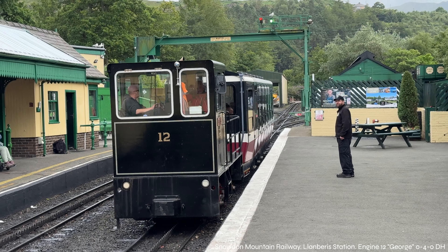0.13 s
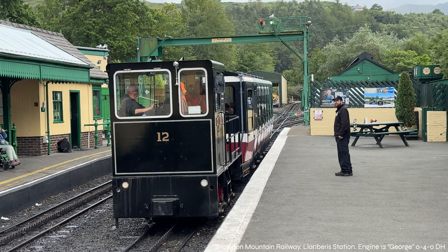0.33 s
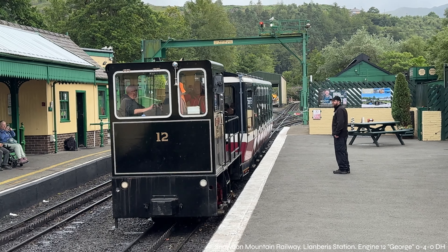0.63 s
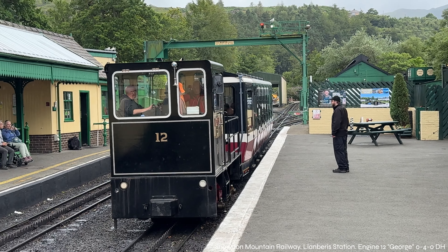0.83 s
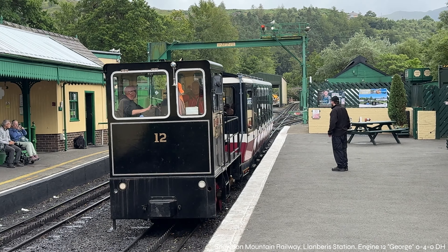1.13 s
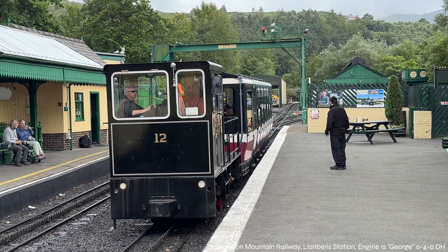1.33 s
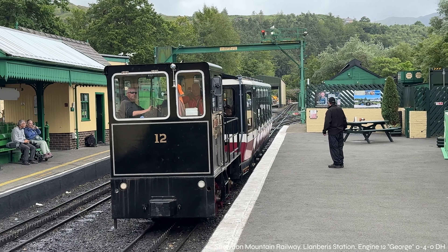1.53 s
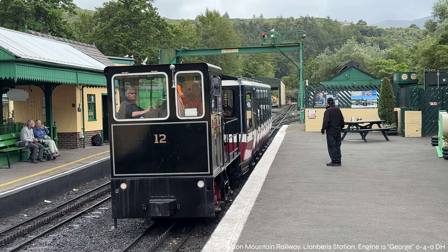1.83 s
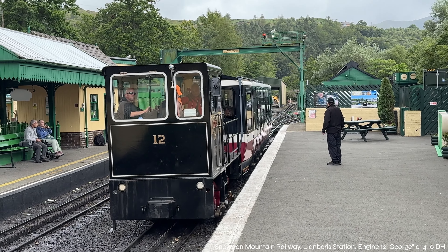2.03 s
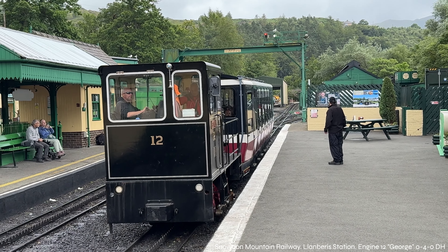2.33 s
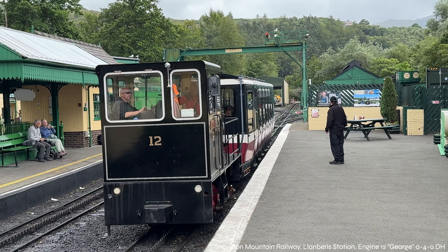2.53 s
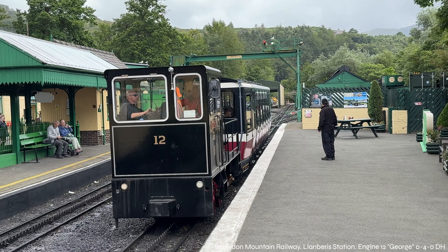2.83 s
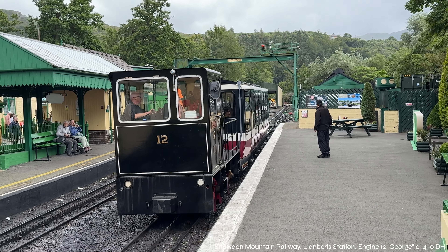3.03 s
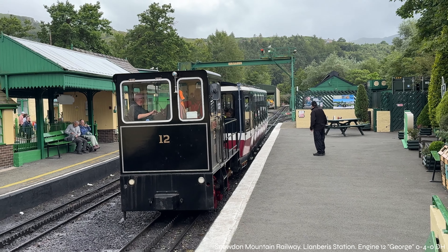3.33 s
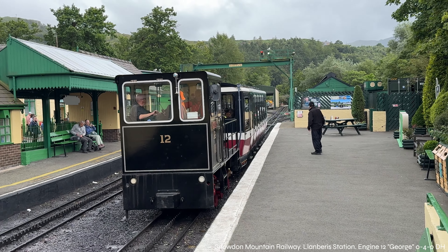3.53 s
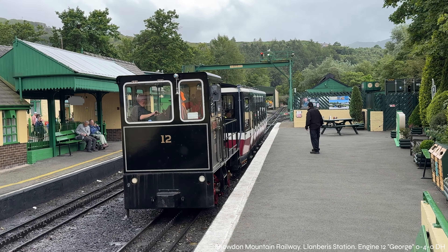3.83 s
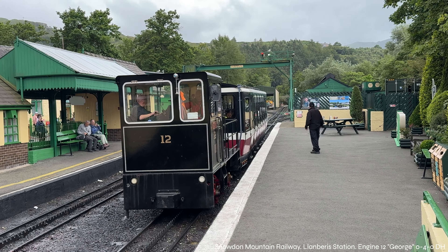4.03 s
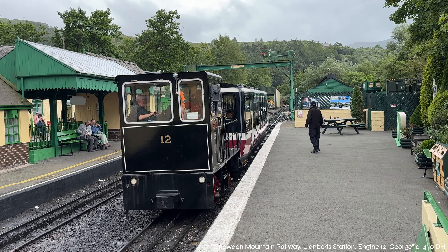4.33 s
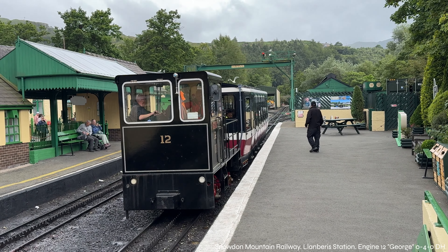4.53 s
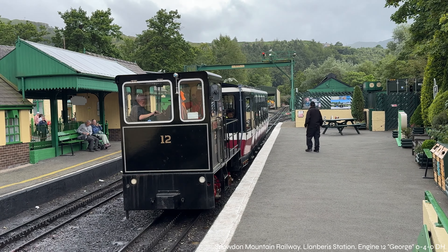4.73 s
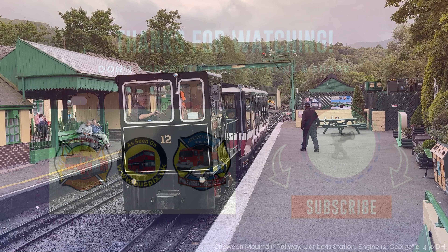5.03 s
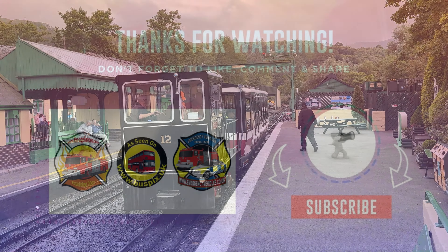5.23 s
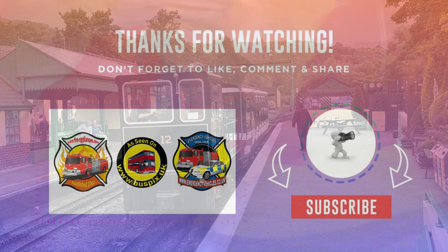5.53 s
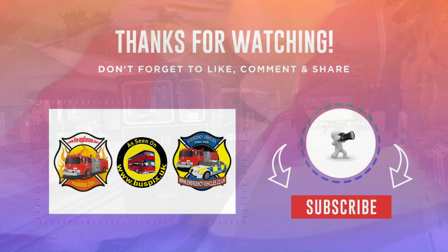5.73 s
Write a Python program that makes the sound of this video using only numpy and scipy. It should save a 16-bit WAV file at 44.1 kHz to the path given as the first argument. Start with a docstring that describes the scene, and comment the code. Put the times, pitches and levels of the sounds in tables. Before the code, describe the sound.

A diesel rack locomotive rolls slowly into an open-air station, close and slightly left in a stereo pickup, with short scattered reflections. From 0 s there is deep rumble, gritty mid-range roar, fine grinding, an engine hum and clatter underneath, and soft low booms as the frame sways. Metal teeth knock about every 0.1 s until 1.1 s, strongest around 0.5-0.9 s, then more irregularly to 2.8 s, each a thud, clank, short ping and scrape. At 1.8-2.6 s a rough, trembling brake groan sinks from a middling-low pitch. From 2.8 s the knocks are gone and the rumble dwindles; the rest of the running noise eases after 3.7 s. The multi-toned hum stands out, sinking slightly to idle. Faint high air whistles step up then down at 2.95-3.5 s and again at 3.95-5.0 s, ending lower. Thin hiss remains; everything fades from 5.1 to 5.8 s.

```python
"""A diesel rack locomotive creeps into a mountain station and slows to a halt.
From the start its running gear rumbles, its frame booms and the engine hums and clatters; the pinion knocks
over the rack teeth. Then a brake groans briefly, sinking in pitch. As the wheels fall quiet the hum stands out
and settles to idle, while an air valve whistles twice in stepping notes. At the end the sound fades out.
Rough sounds are filtered noise and small impacts; the hum, groan, whistles and clean rings are sine waves."""
import sys
import numpy as np
from scipy import signal
from scipy.fft import rfft, irfft
from scipy.io import wavfile
from scipy.ndimage import uniform_filter1d

SR = 44100
rng = np.random.default_rng(int(sys.argv[2]) if len(sys.argv) > 2 else 0)


def wav_record(signal):
    """Record a signal, one row per channel, as 16-bit PCM in the file named by sys.argv[1]."""
    frames = np.transpose(np.atleast_2d(signal))
    bounded = np.clip(frames, -1, 1)
    # unit amplitude maps onto the largest positive 16-bit level
    quanta = np.round(bounded * 32767).astype(np.int16)
    wavfile.write(sys.argv[1], SR, quanta)


N = 260184
TIME, FREQ = np.arange(N) / SR, np.fft.rfftfreq(N, 1 / SR)   # seconds, Hz


def from_db(db):
    """Turn decibels into a gain."""
    return 10 ** (np.asarray(db) / 20)


def rms_one(x):
    """Scale a signal to an rms of one."""
    return x / np.sqrt(np.mean(x ** 2) + 1e-20)


def in_time(rows):
    """Read each column of a curve table at every sample."""
    s, *columns = np.transpose(rows)
    return [np.interp(TIME, s, c) for c in columns]


def response(points):
    """Gain at every frequency from (Hz, dB) points; it falls away below the first."""
    hz, db = np.transpose(points)
    gain = from_db(np.interp(np.log(FREQ + 1), np.log(hz), db))
    return gain * np.minimum(FREQ / hz[0], 1) ** 2


def colour(x, points):
    """Shape a white signal with a spectrum, keeping its power."""
    return irfft(rfft(x) * rms_one(response(points)), N)


def resonate(x, modes):
    """Resonances side by side with alternating signs; a white signal keeps its power."""
    out, power = 0, 0
    for k, (hz, width, db) in enumerate(modes):
        r = np.exp(-np.pi * width / SR)
        peak = (1 - r * r) / 2
        feedback = [1, -2 * r * np.cos(2 * np.pi * hz / SR), r * r]
        mode = signal.lfilter([peak, 0, -peak], feedback, x + 1e-18)
        out = out + (-1) ** k * from_db(db) * mode
        power += peak * from_db(db) ** 2
    return out / np.sqrt(power)


def drift(rate):
    """Slow random motion of spread 1; a higher rate in Hz moves faster."""
    return rms_one(irfft(rfft(rng.standard_normal(N)) / (1 + (FREQ / rate) ** 2), N))


def contacts(per_s, spread_db, share):
    """Random small impacts of uneven size over smooth friction noise; share is the impacts' part of the power."""
    sizes = from_db(spread_db * np.minimum(rng.exponential(1, N), 3))
    clicks = (rng.random(N) < per_s / SR) * sizes * rng.choice([-1, 1], N)
    share = np.clip(share, 0, 1)
    return np.sqrt(share) * rms_one(clicks) + np.sqrt(1 - share) * rng.standard_normal(N)


def blows(times, levels_db, attack_s, decay_s):
    """Envelope of blows that rise quickly and die away; overlapping blows add in power."""
    power = np.zeros(N)
    for s, db in zip(times, levels_db):
        age = TIME[TIME >= s] - s
        shape = (1 - np.exp(-age / attack_s)) * np.exp(-age / decay_s)
        power[N - len(age):] += (from_db(db) * shape) ** 2
    return np.sqrt(power)


def tones(times, pitches, levels_db, attack_s, decay_s):
    """Clean sine rings, one for each blow."""
    return sum(blows([s], [db], attack_s, decay_s) * np.sin(2 * np.pi * hz * (TIME - s))
               for s, hz, db in zip(times, pitches, levels_db))


# Colours of rumble, roar and grinding. Each row: frequency in Hz, relative level in dB per Hz.
RUMBLE_COLOUR = [(25, -20), (36, -12.5), (45, -3), (60, 4), (80, 5.5), (115, -1.5), (170, -6), (300, -59)]
ROAR_COLOUR = [(70, -18), (135, -0.5), (220, 0.5), (350, 0.5), (450, -4), (720, -8.5), (960, -8.5),
               (1050, -6.5), (1220, -18), (1700, -49)]
GRIND_COLOUR = [(1000, -13.5), (1900, 1), (2450, 2), (2800, -0.5), (3300, -2.5), (3900, -4.5), (5200, -10),
                (6600, -9.5), (8000, -16.5), (10000, -16), (12500, -26), (16000, -41)]
# How the rack with its bed, and the pinion with its gears, ring; the knocks use both again.
# Each row: frequency in Hz, width in Hz, relative level in dB.
RACK_MODES = [(490.4, 45, 4), (692, 74, 6.5), (868, 133, 2.5), (1309, 70, -1)]
PINION_MODES = [(1425, 108, -5.5), (1713, 133, -3), (1982, 107, -7), (2232, 67, -9), (2550, 340, -18),
                (3300, 1000, -24.5)]
# Force on the pinion. Each row: time in seconds, relative force in dB.
PINION_LOAD = [(0.06, -11.5), (0.21, -5), (0.5, 8), (0.85, 2.5), (0.98, -18.5), (1.6, -13.5), (2.2, -2.5),
               (2.5, -5), (2.75, -4.5), (2.81, -23), (2.88, -6), (3.3, 0)]
LOAD_SHARE = 0.18   # part of the load's swing in dB that mesh and grinding follow
RUMBLE_DB, ROAR_DB, MESH_DB, GRIND_DB = -29, -25.5, -31, -40   # levels before halting and wander
RUMBLE_HALTING_S, RUMBLE_HALT_DB_PER_S = 2.63, 4   # the rumble begins to fall quiet earlier and faster
HALTING_S, HALT_DB_PER_S = 3.73, 2.5   # roar, mesh and grinding


def running_gear():
    """Wheels and rods shake the frames; a random wander moves roar, gear mesh and grinding together."""
    load_db, = in_time(PINION_LOAD)
    pressed_db = LOAD_SHARE * (load_db - load_db.mean())
    wander = drift(rate=21)
    halt_db = HALT_DB_PER_S * np.maximum(TIME - HALTING_S, 0)
    rumble_halt_db = RUMBLE_HALT_DB_PER_S * np.maximum(TIME - RUMBLE_HALTING_S, 0)

    rumble = colour(contacts(per_s=160, spread_db=1.5, share=0.17), RUMBLE_COLOUR)
    rumble = from_db(RUMBLE_DB - rumble_halt_db) * rumble
    roar = colour(contacts(per_s=250, spread_db=2.0, share=0.27), ROAR_COLOUR)
    roar = from_db(ROAR_DB - halt_db + 1.0 * wander) * roar
    mesh_gain = from_db(MESH_DB + pressed_db - halt_db + 1.27 * wander)
    mesh_contacts = contacts(per_s=360, spread_db=1.0, share=0.41)
    mesh = resonate(mesh_gain * mesh_contacts, RACK_MODES + PINION_MODES)
    grind = colour(contacts(per_s=640, spread_db=3.5, share=0.08), GRIND_COLOUR)
    grind = from_db(GRIND_DB + pressed_db - halt_db + 0.76 * wander) * grind
    return rumble + roar + mesh + grind


# Heavy sways of the frame. Each row: start in seconds, pitch in Hz, relative level in dB.
BOOMS = [(0.0, 58, -19.5), (0.205, 54.5, -20.5), (0.5, 60, -30), (0.82, 56, -29), (0.98, 63.7, -25),
         (1.135, 55.2, -25.5), (1.755, 79.7, -25), (2.04, 90.7, -28.5), (2.146, 88.5, -23), (2.38, 76, -27),
         (2.495, 72, -28), (2.61, 58.7, -22.5), (2.81, 80.3, -28)]


def frame_booms():
    """The sprung frame swings for a few cycles after each lurch."""
    s, hz, db = np.transpose(BOOMS)
    return tones(s, hz, db + 11, attack_s=0.058, decay_s=0.047)


# Exhaust resonances. Each row: frequency in Hz, width in Hz, relative level in dB.
EXHAUST_MODES = [(107.25, 0.8, 3.5), (109.3, 1.3, 0), (129.4, 7, -0.5), (136.0, 3.2, 4.5),
                 (206.2, 1.1, 1.5), (234.9, .8, 6), (383.4, 1.0, 2), (388.3, 2.2, 2)]


def exhaust_db(hz):
    """Gain of the exhaust, in dB, for an order at this pitch."""
    power = sum(from_db(db) ** 2 / (1 + (2 * (hz - centre) / width) ** 2)
                for centre, width, db in EXHAUST_MODES)
    return 10 * np.log10(power)


# Engine speed. Each row: time in seconds, the hum's fundamental in Hz (half the firing rate).
ENGINE_SPEED = [(2.7, 23.4), (3.1, 23.1), (3.7, 22.42), (4.1, 21.87), (4.5, 21.48), (4.68, 21.37),
                (4.8, 21.35)]
# Engine effort. Each row: time in seconds, relative level in dB shared by hum and clatter.
EFFORT = [(2.9, -30.5), (3.35, -29.5), (4.1, -28), (4.5, -31.5), (4.75, -29.5), (5.0, -34.5)]
# Orders (multiples of the fundamental) that boom as the sinking speed carries them through an exhaust
# resonance. A plain list of multiples.
BOOMING_ORDERS = (5, 6, 9, 11, 17, 18)
# Weaker, steadier orders. Each row: multiple of the fundamental, relative level in dB.
STEADY_ORDERS = [(2, -10), (3, -13), (7, -10.5), (14, -8), (27, -10)]
# Engine block and covers. Each row: frequency in Hz, width in Hz, relative level in dB.
BLOCK_MODES = [(208, 17, -9), (386.4, 29, 3.5), (568.3, 29.6, 4.5), (718, 61, -2), (933.6, 50, -1),
               (1114, 90, -8), (1428, 144, -4.5), (1790, 95, -12), (3310, 90, -17)]
HUM_WAVER_DB = 0.8   # spread of each order's own slow waver


def engine():
    """The exhaust hums on multiples of the engine speed; every firing sets the block clattering."""
    hz = in_time(ENGINE_SPEED)[0] * (1 + .0008 * drift(rate=4))
    turns = np.cumsum(hz) / SR   # cycles of the fundamental so far
    effort_db, = in_time(EFFORT)

    orders = [(k, exhaust_db(k * hz)) for k in BOOMING_ORDERS]
    orders += [(round(k), db) for k, db in STEADY_ORDERS]
    hum = 0
    for k, db in orders:
        gain = from_db(effort_db + db + 0.5 + HUM_WAVER_DB * drift(rate=6.9))
        hum = hum + gain * np.sin(2 * np.pi * (k * turns + rng.random()))

    # valve gear and injectors repeat their pattern every six firings
    place = ((turns % 3) * SR / hz[-1]).astype(int)
    repeating = rng.standard_normal(SR)[place]
    firing = rms_one(np.exp(-(2 * turns % 1) / 0.39) + 1.8)   # two firings a cycle
    clatter = resonate(firing * (0.92 * repeating + 0.73 * rng.standard_normal(N)), BLOCK_MODES)
    return hum + from_db(effort_db - 1.5) * clatter


# Knocks of the pinion over the rack teeth, unevenly spaced. Each row: touch in seconds, then relative levels
# in dB of the frame thud, rack clank, pinion ring and flank scrape.
KNOCKS = [(0.112, -36, -28, -39, -34.5), (0.209, -18, -18.5, -31.5, -37.5),
          (0.299, -15.5, -21.5, -32.5, -34), (0.396, -23, -21.5, -40, -28), (0.498, -21, -18.5, -25.5, -29),
          (0.594, -21.5, -19, -23.5, -32), (0.694, -25.5, -15.5, -23.5, -32.5),
          (0.790, -16.5, -15, -21.5, -42), (0.88, -19, -18, -35, -51), (0.993, -25, -23.5, -44, -37),
          (1.07, -17, -23.5, -40, -44), (1.135, -22, -27, -38.5, -37.5), (1.32, -22, -23, -38, -46),
          (1.495, -20.5, -22, -34.5, -45), (1.735, -22, -21.5, -36, -36), (1.865, -17.5, -25.5, -33.5, -35),
          (1.963, -15.5, -22.5, -40, -34.5), (2.083, -34, -22.5, -37.5, -34), (2.205, -19, -20, -35, -32),
          (2.267, -21.5, -20, -35.5, -36), (2.437, -36.5, -22, -38, -35), (2.551, -29, -25, -32, -38),
          (2.68, -18.5, -20, -32.5, -36.5), (2.742, -18, -26.5, -36.5, -36), (2.81, -17.5, -33, -46, -50)]
# Colours of thud and scrape. Each row: frequency in Hz, relative level in dB per Hz.
THUD_COLOUR = [(45, -2.5), (100, 16.5), (220, 15.5), (340, 15.5), (500, 4), (900, -41)]
SCRAPE_COLOUR = [(1500, 5.5), (3200, 8.5), (5200, -2), (6800, 0.5), (10000, -20.5), (16000, -9)]
THUD_LAG_S, CLANK_LAG_S, PING_LAG_S = .016, 0.00405, 0.00079   # after the tooth touches
REBOUND_S, REBOUND_LOSS_DB = 0.017, 2.5   # a tooth rebounds once in its backlash
PING_HZ, PING_DB = 1957, 8.0   # clean first strike; level against the table's ring
RACK_RING_HZ, RACK_RING_DB, RACK_RING_S = 815, -6, .045   # level against the table's clank; time to fall by 1/e
PITCH_SPREAD = .025   # share by which both pitches differ from tooth to tooth


def rack():
    """Each tooth pings and rings the pinion, scrapes, rebounds, clanks the rack, which sings on, and thuds."""
    s, thud_db, clank_db, ring_db, scrape_db = np.transpose(KNOCKS)
    touches = np.r_[s, s + REBOUND_S]
    rings_db = np.r_[ring_db, ring_db - REBOUND_LOSS_DB]
    scrapes_db = np.r_[scrape_db, scrape_db - REBOUND_LOSS_DB]
    detune = 1 + PITCH_SPREAD * rng.standard_normal((len(s), 2))

    ping = tones(s + PING_LAG_S, PING_HZ * detune[:, 0], ring_db + PING_DB, attack_s=0.003, decay_s=0.007)
    sing = tones(s + CLANK_LAG_S, RACK_RING_HZ * detune[:, 1], clank_db + RACK_RING_DB,
                 attack_s=0.004, decay_s=RACK_RING_S)
    ring = blows(touches, rings_db, attack_s=0.0011, decay_s=0.035)
    ring = resonate(ring * contacts(per_s=500, spread_db=4.0, share=0.8), PINION_MODES)
    clank = blows(s + CLANK_LAG_S, clank_db, attack_s=0.0046, decay_s=0.03)
    clank = resonate(clank * contacts(per_s=500, spread_db=0.0, share=0.53), RACK_MODES)
    thud = blows(s + THUD_LAG_S, thud_db, attack_s=0.0056, decay_s=0.03)
    thud = colour(thud * contacts(per_s=320, spread_db=-0.5, share=0.33), THUD_COLOUR)
    scrape = blows(touches, scrapes_db, attack_s=0.0015, decay_s=0.017)
    scrape = colour(scrape * contacts(per_s=4100, spread_db=0.0, share=0.16), SCRAPE_COLOUR)
    return ping + sing + ring + clank + thud + scrape


GROAN_START_S, GROAN_ATTACK_S, GROAN_END_S, GROAN_RELEASE_S = 1.8, 0.058, 2.57, 0.23
GROAN_HZ, GROAN_SAG_HZ_PER_S, GROAN_DB = 348.5, 67.3, -27   # starting pitch, its fall, middle level


def brake():
    """A brake block bites, holds and lets go: a rough stick-slip tone that sinks as the wheel slows."""
    age = TIME - GROAN_START_S
    release = (GROAN_END_S - TIME) / GROAN_RELEASE_S
    grip = np.clip(np.minimum(age / GROAN_ATTACK_S, release), 0, 1)
    hz = (GROAN_HZ - GROAN_SAG_HZ_PER_S * age) * (1 + 0.0523 * drift(rate=43))
    phase = 2 * np.pi * np.cumsum(hz) / SR
    return grip * from_db(GROAN_DB + 2.6 * drift(rate=28)) * np.sin(phase)


# Notes of the air valve, rising and then sinking in steps, twice.
# Each row: start in seconds, length in seconds, starting pitch in Hz, glide in Hz per second,
# starting level in dB before the flutter.
WHISTLES = [(2.95, .075, 4660, 300, -47.5), (3.01, 0.045, 5270, 4500, -44.5),
            (3.05, 0.1, 5880, 1500, -48.5), (3.2, 0.14, 6000, -3600, -47.5),
            (3.367, 0.12, 5010, -1300, -45), (3.96, 0.11, 4370, -200, -49),
            (4.06, 0.045, 5050, 24000, -49.5), (4.10, 0.05, 6230, 1200, -45),
            (4.15, 0.16, 6230, -4900, -46), (4.32, 0.125, 5060, -1100, -46.5),
            (4.45, .035, 4680, 6000, -44.5), (4.49, 0.15, 4170, -1050, -49), (4.67, .065, 3970, -500, -48),
            (4.805, .22, 3000, -900, -45.5)]
NOTE_FADE_DB_PER_S, NOTE_WAVER = 12, .011   # fade within a note; share by which its pitch wavers


def air_valve():
    """Escaping air makes an unsteady edge tone that jumps from note to note."""
    out, waver, flutter_db = 0, drift(rate=200), 3.6 * drift(rate=45)
    for s, length, start_hz, glide, db in WHISTLES:
        age = np.clip(TIME - s, 0, length)
        blowing = uniform_filter1d(1. * ((age > 0) & (age < length)), size=800)   # softened edges
        hz = (start_hz + glide * age) * (1 + NOTE_WAVER * waver)
        gain = blowing * from_db(db + flutter_db - NOTE_FADE_DB_PER_S * age)
        out = out + gain * np.sin(2 * np.pi * np.cumsum(hz) / SR)
    return out


# Reflections off platform and buildings. Each row: frequency in Hz, level in dB against the direct sound.
REFLECTED = [(60, -29), (300, -15), (600, -9), (1000, -4), (1400, -6.5), (2100, -22.5), (3500, -11.5),
             (6000, -21), (8600, -81.5), (10000, -11), (14000, -18.5)]


def station(x):
    """Scattered reflections follow the direct sound, with opposite signs on the two sides."""
    scatter = rfft(rng.standard_normal(N) * (TIME > .02) * np.exp(-TIME / .08))
    scatter = scatter / np.sqrt(np.mean(abs(scatter) ** 2))
    side = irfft(rfft(x) * scatter * response(REFLECTED), N)
    return np.array([x + side, x - side])


def scene():
    """The whole locomotive in its station, a little to the left."""
    locomotive = running_gear() + frame_booms() + engine() + rack() + brake() + air_valve()
    return station(locomotive) * from_db([[.3], [-.3]])


# Microphone pair. Each row: frequency in Hz, phase in radians by which the left side leads the right.
PORT_PHASE = [(400, .05), (700, .3), (1300, -.8), (1900, 0), (3100, .5), (5500, 0), (6600, 0), (7300, 1.2),
              (7750, 3.1), (9300, 3.1), (9700, 2.6), (12500, 2.0), (15500, 1.2)]
# Colour of the thin steady hiss. Each row: frequency in Hz, relative level in dB per Hz.
PORT_HISS = [(8800, -40), (9800, 0), (15500, -2)]
PORT_HISS_DB = -62.5
FADE_START_S, FADE_END_S = 5.07, 5.826
CUTOFF_HZ = 15750


def record(dry):
    """The ports shift the phase between the sides and add a thin hiss; the level fades out and the top is cut."""
    lead = np.interp(FREQ, *np.transpose(PORT_PHASE))
    pair = irfft(rfft(dry) * np.exp(.5j * np.array([lead, -lead])), N)
    pair = pair + from_db(PORT_HISS_DB) * colour(rng.standard_normal(N), PORT_HISS)
    fade = np.clip((FADE_END_S - TIME) / (FADE_END_S - FADE_START_S), 0, 1)
    top_cut = signal.ellip(10, .2, 80, CUTOFF_HZ, fs=SR, output="sos")
    return signal.sosfilt(top_cut, pair * fade)


dry = scene()
out = record(dry)
wav_record(out)
```